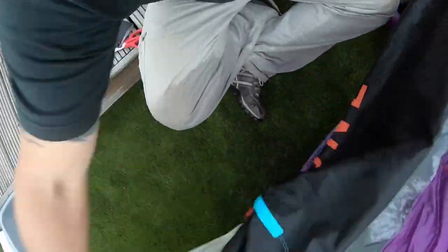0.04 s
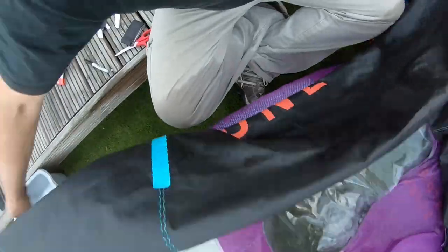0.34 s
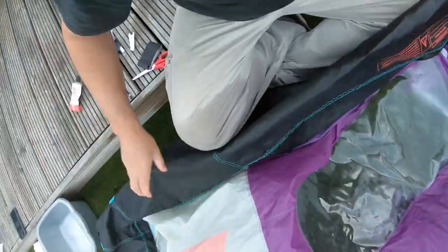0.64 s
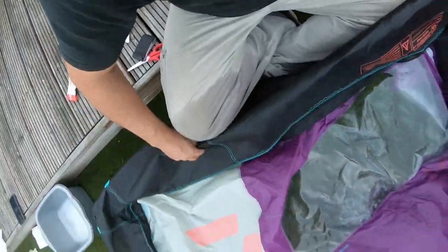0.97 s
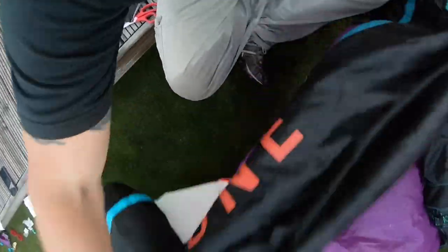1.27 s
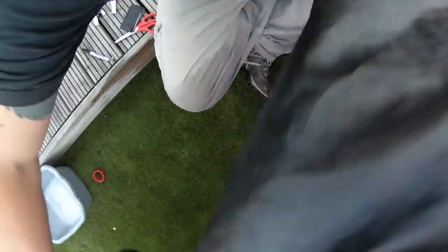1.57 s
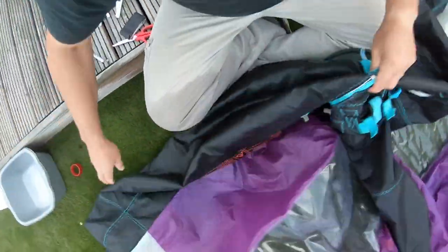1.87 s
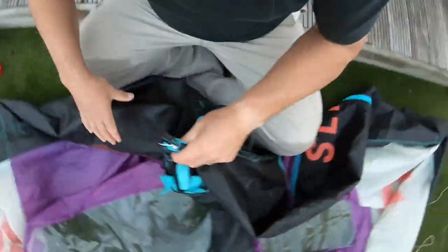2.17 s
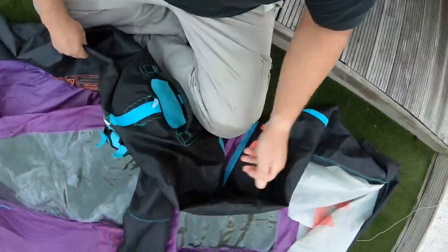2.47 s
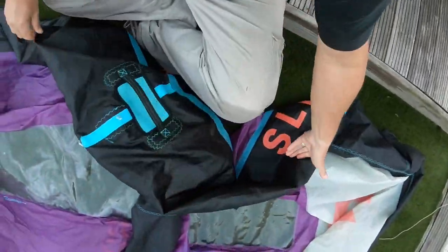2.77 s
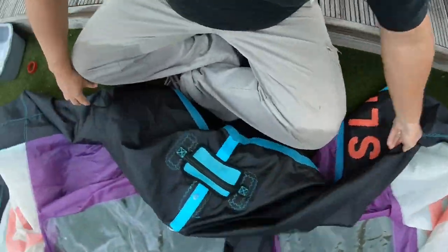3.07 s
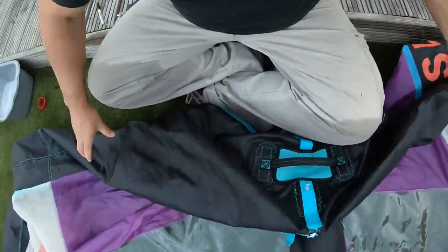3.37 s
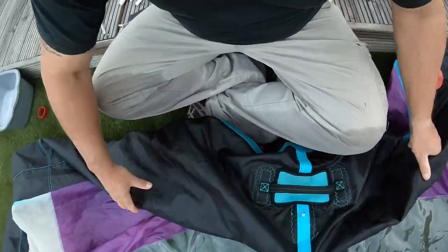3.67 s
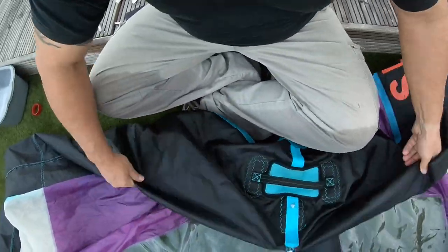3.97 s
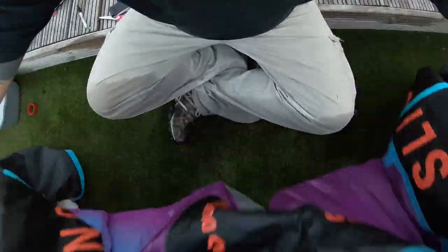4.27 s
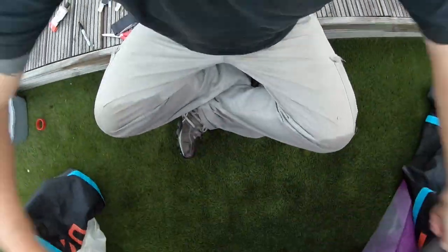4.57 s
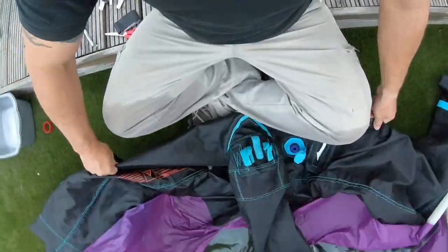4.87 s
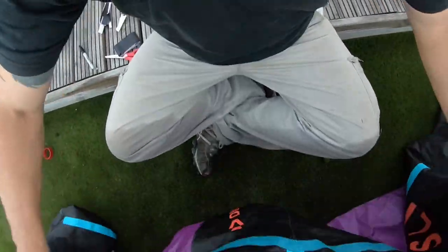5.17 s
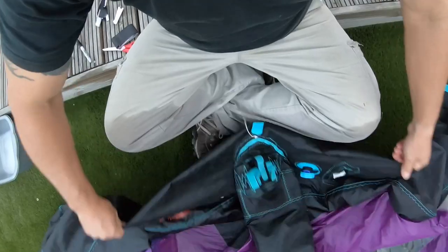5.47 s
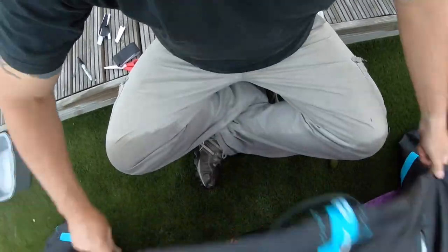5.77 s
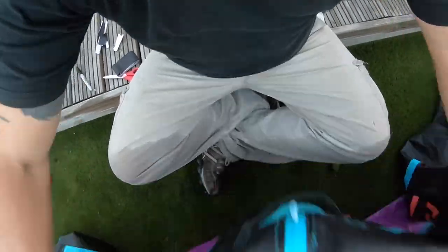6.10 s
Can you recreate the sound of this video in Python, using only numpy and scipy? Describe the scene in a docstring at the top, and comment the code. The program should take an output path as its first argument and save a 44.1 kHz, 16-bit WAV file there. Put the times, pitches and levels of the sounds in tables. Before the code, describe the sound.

The stiff cloth of an inflatable wing is pulled and shaken by hand on a lawn, close to the microphone and slightly to the left. From the start, creases crackle, wide folds rumple and the weave hisses in jerky surges, with a few dry snaps and dull flaps. After a short lull the rustle builds, and near 1.5 seconds a hard shake brings a brief, bright skid, thuds and a low push of air. From about 2 to 4 seconds the handling is gentler, with softer crinkling, light sliding and occasional pats. Just after 4 seconds strong pulls return. Panels flap taut around 4.6, 5.4 and 5.7 seconds, and snaps and billows crowd together until the end, a little past 6 seconds. Faint steady outdoor noise and an uneven breeze rumble lie underneath throughout.

```python
"""The stiff cloth of an inflatable wing is pulled and shaken by hand on a lawn, near the microphone.
From the start, buckling creases crackle, wide folds rumple, friction hisses and the sheet pushes air,
over faint outdoor noise and breeze; the ground reflects it all. Creases snap and panels flap taut.
Near 1.5 s a panel skids brightly amid a hard shake. From 2 to 4 s the handling is gentler;
then strong pulls, flaps and snaps return and crowd together towards the end."""
import sys
import numpy as np
from scipy import signal
from scipy.fft import rfft, irfft
from scipy.io import wavfile

SR = 44100
rng = np.random.default_rng(int(sys.argv[2]) if len(sys.argv) > 2 else 0)


def materialize(psi):
    """Save the field psi as 16-bit PCM at rate SR to the path in sys.argv[1].

    A 1-D psi becomes a single channel; in a 2-D psi each row is a channel.
    """
    bounded = np.clip(np.atleast_2d(psi).T, -1, 1)
    quanta = np.round(bounded * 32767).astype(np.int16)
    wavfile.write(sys.argv[1], SR, quanta)


N = 275184
TIME = np.arange(N) / SR
SLOW_TIME = TIME[::64]


def gain_of(db):
    """Amplitude ratio of a level in decibels."""
    return 10 ** (np.asarray(db) / 20)


def unit_rms(x):
    """Normalisation to rms 1."""
    return x / np.sqrt(np.mean(x ** 2) + 1e-20)


def curve_at(points, hz):
    """Interpolation on a logarithmic frequency axis."""
    f, value = np.transpose(points)
    return np.interp(np.log(hz + 1), np.log(f + 1), value)


def add(mix, s, sound):
    """Superposition of a stereo sound, starting at time s."""
    part = mix[:, max(round(s * SR), 0):][:, :sound.shape[1]]
    part += sound[:, :part.shape[1]]


def panned(x, side_db):
    """Intensity panning: the left channel gains side_db over the right."""
    return x * gain_of(np.array([[.5], [-.5]]) * side_db)


def wander(hz):
    """Random modulation: noise rolled off below 12 Hz and above hz, its extremes compressed."""
    f = np.fft.rfftfreq(N, 1 / SR)
    band = np.exp(-(f / hz) ** 2) * (1 - np.exp(-(f / 12) ** 2))
    drift = irfft(rfft(rng.standard_normal(N)) * band, N)
    return 2 * np.tanh(unit_rms(drift) / 2)


def colour(x, spectrum, size=4096):
    """Minimum-phase filtering, which keeps the fronts of clicks sharp."""
    log_gain = np.log(gain_of(curve_at(spectrum, abs(np.fft.fftfreq(size, 1 / SR)))))
    taps = np.fft.ifft(np.exp(np.conj(signal.hilbert(log_gain)))).real
    return signal.oaconvolve(x, taps[None], axes=1)[:, :x.shape[1]]


def ports(x):
    """Partial coherence: a wide source reaches two microphone ports only partly alike."""
    # likeness of the ports: f/Hz, correlation
    likeness = [(30, 1), (70, 0.44), (150, 0.92), (350, 0.99), (700, 0.65), (1300, 0.18), (1800, 0.55),
                (3700, 1), (5000, 0.49), (6200, 0.31), (7200, 0.033), (15000, 0.062)]
    # lead of the left port: f/Hz, phase/rad
    lead = [(300, -0.43), (550, 0.14), (800, -1.52), (1400, -0.46), (2300, -0.79), (2800, -0.81),
            (5000, 0.26)]
    # excess of left over right: f/Hz, level/dB
    lean = [(40, 7), (110, 4.5), (200, 2.5), (380, 4), (700, 5), (1290, 2.5), (2380, -1), (4400, 3.5),
            (8120, 2), (15000, -3)]
    hz = np.fft.rfftfreq(x.shape[1], 1 / SR)
    common, apart = rfft(x)
    same = np.clip(curve_at(likeness, hz), -.99, .99)
    mid, side = common * np.sqrt(1 + same), apart * np.sqrt(1 - same)
    pair = np.array([mid + side, (mid - side) * np.exp(-1j * curve_at(lead, hz))])
    return irfft(panned(pair, curve_at(lean, hz) - 3), x.shape[1])


def noise(spectrum):
    """Spectral shaping of Gaussian noise, in stereo at rms 1."""
    return unit_rms(ports(colour(rng.standard_normal((2, N)), spectrum)))


def arch_db(s, swell_s, settle_s):
    """Envelope of a movement: up 21.5 dB in swell_s, a rounded top at s, down as far in settle_s."""
    return -21.5 * np.maximum((s - SLOW_TIME) / swell_s, (SLOW_TIME - s) / settle_s) ** 1.158


def power_sum(levels_db):
    """Incoherent addition: the amplitude of overlapping movements whose powers add."""
    return np.interp(TIME, SLOW_TIME, np.linalg.norm(gain_of(levels_db), axis=0))


def buckles(per_s, spread_db, low_hz, high_hz, cycles, count=48):
    """Shot noise: spots of cloth buckle at random, each a damped oscillator; a few buckles are large."""
    t, out = np.arange(2048) / SR, np.zeros((2, N))
    size = gain_of(spread_db * np.minimum(rng.exponential(1, N), 4))
    occurs = rng.random(N) < per_s / SR
    kicks = size * occurs * rng.choice([-1, 1], (2, N))
    spot = rng.integers(0, count, N)
    for k, hz in enumerate(np.geomspace(low_hz, high_hz, count)):
        ring = hz * np.cos(2 * np.pi * hz * t) * np.exp(-t * hz / cycles)  # small spots ring sharper
        out += signal.oaconvolve(kicks * (spot == k), ring[None], axes=1)[:, :N]
    return unit_rms(out)


def rustle(grains, rubbing, spectrum, swell_db):
    """Amplitude modulation gathers grains and friction noise into clumps, coloured by the cloth."""
    clumps = (grains + rubbing * rng.standard_normal((2, N))) * gain_of(swell_db)
    return unit_rms(ports(colour(clumps, spectrum)))


def crinkling(jerks):
    """Buckling of small creases radiates a dense crackle with stray ticks."""
    # response of the creases: f/Hz, level/dB
    spectrum = [(300, -13.5), (700, -5.5), (1200, -2), (2200, 0), (2700, -3), (3500, -2), (4500, -11),
                (5400, -7), (6300, -6), (7000, -12), (7800, -15.5), (8400, -45), (11000, -47), (16000, -29)]
    creases = buckles(per_s=6000, spread_db=3, low_hz=450, high_hz=8750, cycles=2.3)
    ticks = buckles(per_s=19, spread_db=1.5, low_hz=1780, high_hz=5000, cycles=0.68, count=6)
    return rustle(creases + gain_of(-19) * ticks, 1, spectrum, 1.22 * jerks)


def rumpling(jerks):
    """Wide folds buckle at lower natural frequencies, with stray thuds."""
    # response of the folds: f/Hz, level/dB
    spectrum = [(60, -33), (130, -1), (220, 1), (420, -3), (600, -6.5), (900, -7.5), (1600, -17.5),
                (4000, -50)]
    folds = buckles(per_s=1600, spread_db=3, low_hz=89.7, high_hz=2460, cycles=1)
    thuds = buckles(per_s=15, spread_db=1, low_hz=377, high_hz=1130, cycles=1.3, count=8)
    return rustle(folds + gain_of(-18.5) * thuds, 1.95, spectrum, 0.72 * jerks)


def weave_hiss(sliding, jerks):
    """Friction of weave on weave gives a smooth hiss in pulls and skids."""
    # friction spectrum: f/Hz, relative level/dB
    sheen = [(2000, -43), (3500, -59), (4600, -22), (6200, 34), (7700, 33.5), (8700, 28.5), (10200, 24.5),
             (12000, 18.5), (14000, 16.5), (16000, -6)]
    return np.hypot(sliding, skidding()) * gain_of(1.57 * jerks) * noise(sheen)


def moved_air(pull, jerks):
    """Displacement of air by billows and by the draught of each pull gives a low rumble."""
    # billows of the loose sheet: peak t/s, level/dB, swell and settle time/s
    billows = [(0.06, -34.5, .3), (0.246, -28.5, 0.053), (0.57, -24, 0.058), (1.49, -17, 0.14),
               (1.575, -17, 0.15), (1.70, -26, 0.055), (3.918, -28, 0.051), (4.343, -35, 0.14),
               (4.589, -20, 0.054), (4.744, -24.5, 0.12), (5.051, -26, 0.043), (5.18, -25, .09),
               (5.39, -22, .14), (5.492, -17, 0.14), (5.7, -20, 0.1), (5.895, -22, .22), (6.21, -28, 0.16)]
    # pressure spectrum: f/Hz, relative level/dB
    spectrum = [(10, -18), (25, -9), (45, 3.5), (72, 2.5), (100, 4), (130, 0.5), (180, -3.5), (300, -18.5),
                (800, -69.5)]
    s, top_db, length_s = np.transpose(billows)[:, :, None]
    billowing = power_sum(top_db + arch_db(s, length_s, length_s))
    draught = gain_of(-13.5) * pull
    return np.hypot(billowing, draught) * gain_of(-1.5 + 0.25 * jerks) * noise(spectrum)


def pulled_cloth():
    """Common modulation: each jerky pull drives creases, folds, hiss and air together."""
    # pulls of the hands: fastest t/s, swell/s, settle/s, level/dB, extra rumple/dB, extra hiss/dB
    pulls = [(0.048, 0.93, 0.28, -25, 1, 1.5), (0.245, 0.05, 0.088, -32, 1, 0),
             (0.41, 0.43, .25, -39, 3, 4.5), (0.55, 0.24, 0.3, -33, 0, 0.5),
             (0.77, 0.14, 0.23, -42, 6.5, -4.5), (1.195, 0.24, 0.25, -24.5, 1, 0.5),
             (1.40, 0.18, 0.19, -29, -19, 7), (1.54, 0.18, 0.24, -20.5, 1, -1),
             (1.825, 1, 0.31, -34.5, 1.5, 0.5), (2.083, 0.25, 0.52, -41, 1.5, 0),
             (2.29, 0.26, 1, -46, 1.5, -2), (2.555, 0.24, 0.23, -41.5, 3.5, 7),
             (2.8, 0.38, 1, -48.5, 2, -14), (2.99, 0.18, .15, -41.5, 1, -2),
             (3.1, 0.17, 0.51, -34.5, -2.5, -0.5), (3.199, 0.25, .2, -34.5, -1.5, 6),
             (3.46, 0.17, 0.12, -47.5, -1, 0), (3.635, 0.027, 0.13, -41.5, 1, 2),
             (3.689, 0.1, 0.32, -39, 0.5, 1), (3.918, 0.097, 0.043, -42, 2.5, -1),
             (4.11, 0.23, 0.38, -30.5, 4.5, 1.5), (4.255, 0.17, 0.37, -26.5, -1.5, -0.5),
             (4.5, 0.32, 0.28, -29, -11, 9.5), (4.59, 0.2, 0.46, -26.5, 3.5, -7),
             (4.755, .15, 0.23, -23, -2.5, 2), (4.987, 0.25, 0.62, -31, -3.5, 5),
             (5.165, 0.093, 0.22, -26.5, -3, 3), (5.3, 0.27, 0.36, -35, 6.5, 3),
             (5.44, 0.35, 0.31, -27, 0.5, 3.5), (5.69, 0.095, .16, -22.5, -2.5, 2.5),
             (5.829, 0.11, 0.062, -24.5, .5, 0.5), (5.905, 0.094, 0.28, -26, 0, 2.5),
             (6.22, 0.31, .6, -26.5, -3, 5)]
    # where the cloth lies: t/s, left over right/dB
    side_curve = [(0, 4), (.4, 2.5), (1.2, 2), (1.5, 5.5), (1.85, 2), (2.45, -0.5), (3.05, 4.5), (3.7, 4.5),
                  (4.0, 2), (4.45, 3), (6.24, 3)]
    s, swell_s, settle_s, top_db, folds_db, weave_db = np.transpose(pulls)[:, :, None]
    arch = arch_db(s, swell_s, settle_s)
    pull = power_sum(top_db + arch)
    folding = power_sum(top_db + folds_db + 0.96 * arch)
    pivot_db, hiss_slope = -27.5, 1.14  # hiss grows faster with speed than crackle does
    sliding = power_sum(pivot_db - 17 + weave_db + hiss_slope * (top_db + arch - pivot_db))
    jerks = wander(hz=60)
    out = gain_of(-1.15) * pull * crinkling(jerks) + folding * rumpling(jerks)
    out += weave_hiss(sliding, jerks) + moved_air(pull, jerks)
    return panned(out, np.interp(TIME, *np.transpose(side_curve)))


def ground_reflection(direct):
    """Scattering at the lawn returns a brief diffuse reflection after 3 ms."""
    t = np.arange(3000) / SR
    scatter = rng.standard_normal((2, len(t))) * np.exp(-t / 0.0047) * (t > .003)
    return signal.oaconvolve(direct, scatter / np.linalg.norm(scatter[0]), axes=1)[:, :N]


def outdoors():
    """Distant outdoor sound forms a stationary noise floor."""
    # ambient spectrum: f/Hz, relative level/dB
    spectrum = [(24, -16), (40, -45), (191, -18), (490, 17), (804, -8), (1060, -3), (1290, -7), (6140, -56),
                (15000, -62)]
    return gain_of(-57) * noise(spectrum)


def breeze():
    """Pressure fluctuations of a faint, uneven breeze rumble on the microphone."""
    # wind spectrum: f/Hz, relative level/dB
    spectrum = [(10, -5.5), (25, 7), (39, -2), (56, 8), (100, -6), (170, -11), (300, -25), (800, -82)]
    return gain_of(-45 + 2.9 * wander(hz=24)) * noise(spectrum)


def burst(hz, decay_s, rise_s, cycles, rough, apart, crack):
    """Transient excitation: a push and a dying flurry drive a broad resonance; crack adds bare flurry."""
    t = np.arange(4096) / SR
    common, side = rng.uniform(-1.005, 1, (2, len(t))) * np.exp(-t / decay_s) * (1 - np.exp(-t / rise_s))
    flurry = np.array([common + apart * side, common - apart * side]) / np.linalg.norm(common)
    ring = np.sin(2 * np.pi * hz * t) * np.exp(-t * hz / cycles)
    response = signal.fftconvolve(rough * flurry + (t == 0), ring[None], axes=1)[:, :len(t)]
    jump = unit_rms(response) + crack * unit_rms(flurry)
    return unit_rms(jump) * np.sqrt((decay_s + cycles / hz) / t[-1]) / 2  # similar peaks at any length


def snaps():
    """Snap-through instability: single stiff creases pop with a dry tick."""
    # snapping creases: t/s, relative level/dB, f/Hz, left over right/dB, decay/s
    creases = [(0.029, -11, 3460, 3, 0.00029), (0.1725, -11.5, 6000, 3, 0.00062),
               (0.1759, -18.5, 1900, -7, .0011), (0.2464, -24, 2090, -7, 0.0018),
               (0.6243, -31, 2620, 4, 0.00069), (0.902, -33.5, 3530, 3, .0008),
               (1.162, -25, 4430, -2, 0.0024), (1.4451, -16.5, 2350, 1, 0.0025),
               (1.5705, -11, 3630, -1, 0.00065), (1.607, -17.5, 2890, -5, 0.0019),
               (2.9135, -30.5, 4560, 1, 0.0011), (3.24, -21.5, 4270, 8, 0.0021),
               (3.508, -45, 1900, 13, .0012), (3.616, -36.5, 2270, 10, 0.00053),
               (4.5518, -13, 1930, 0, 0.00038), (5.139, -16.5, 2500, 3, 0.00054),
               (5.1748, -17.5, 2090, 2, 0.00086), (5.1967, -15.5, 1800, 1, .002),
               (5.6772, -13, 3360, 1, 0.00027), (5.683, -13.5, 3130, 6, 0.0011),
               (5.6827, -16.5, 7600, 6, 0.00055), (5.889, -19.5, 3700, 4, 0.0011)]
    out = np.zeros((2, N))
    for s, db, hz, side_db, decay_s in creases:
        tick = burst(hz, decay_s, rise_s=.0001, cycles=0.72, rough=3.5, apart=0.61, crack=0.24)
        add(out, s, panned(gain_of(db + 6) * tick, side_db))
    return colour(out, [(150, -24), (1000, 1), (3500, 0.5), (4500, -9.5), (6400, 7.5), (8000, -4),
                        (9500, -8), (15000, -25)])


def flaps():
    """A panel pulled taut or patted is a heavily damped membrane: a thud of a few cycles."""
    # flaps and pats: t/s, relative level/dB, f/Hz, left over right/dB, decay/s
    panels = [(0.0925, -17.5, 337, 6, 0.012), (0.1621, -21.5, 450, -2, 0.0054),
              (0.2364, -21, 169, 5, 0.0082), (0.9867, -30.5, 550, 0, .006), (1.0812, -29.5, 850, -5, 0.01),
              (1.1355, -13.5, 295, 1, 0.0047), (1.138, -24, 860, -7, 0.0023), (1.488, -22, 1410, 3, .005),
              (1.4933, -7, 125, 11, 0.0044), (1.539, -9, 193, 8, 0.0071), (1.6466, -13.5, 226, 4, .004),
              (1.6999, -12, 141, 11, .005), (2.3195, -36.5, 555, -1, .005), (2.515, -24, 430, 3, 0.0047),
              (2.674, -30.5, 483, 0, 0.0038), (3.1948, -23.5, 225, 1, 0.0046),
              (3.5057, -38, 896, 10, 0.0043), (3.683, -21.5, 262, 2, .007), (3.912, -29, 694, 1, 0.0012),
              (4.5782, -9, 138, 12, 0.0042), (4.6143, -22.5, 520, 1, 0.0047),
              (4.731, -13.5, 377, 6, 0.0064), (4.7535, -10.5, 233, 5, 0.013), (5.316, -17, 142, 12, 0.01),
              (5.393, -6.5, 200, -2, 0.0065), (5.4086, -9.5, 380, 4, 0.0056),
              (5.4815, -11.5, 115, -5, 0.0052), (5.552, -26, 950, -8, 0.0021), (5.685, -4.5, 204, 4, .009),
              (5.896, -15.5, 217, -5, 0.014), (5.931, -13, 398, 5, 0.0033)]
    out = np.zeros((2, N))
    for s, db, hz, side_db, decay_s in panels:
        thud = burst(hz, decay_s, rise_s=0.00048, cycles=0.86, rough=0.92, apart=0.48, crack=0.27)
        add(out, s, panned(gain_of(db - 0.5) * thud, side_db + 0.5))
    return colour(out, [(25, -1.5), (90, 1.5), (200, -3.5), (400, 4.5), (1500, 13), (3500, -1.5),
                        (7000, -9.5), (12000, -38)])


def skidding():
    """Envelope of sliding friction as one taut panel skids over another: quick start, hold, quick stop."""
    # skids: start t/s, duration/s, level/dB
    skids = [(1.453, 0.13, -33), (2.523, .095, -56), (3.06, 0.33, -61)]
    start, length_s, level_db = np.transpose(skids)[:, :, None]
    edge_s = 0.0061
    inside = np.minimum(TIME - start, start + length_s - TIME) / edge_s
    return (gain_of(level_db) * (1 + np.tanh(inside)) / 2).sum(0)


def scene():
    """Superposition of the cloth, its ground reflection, outdoor noise and breeze."""
    direct = pulled_cloth() + snaps() + flaps()
    return direct + gain_of(-14) * ground_reflection(direct) + outdoors() + breeze()


def record(dry):
    """Soft saturation rounds the loudest cracks; a low-pass filter then limits the band."""
    edge_hz = 15750
    low_pass = signal.firwin(511, edge_hz, window=("kaiser", 9), fs=SR)
    return signal.oaconvolve(np.tanh(dry), low_pass[None], "same")


dry = scene()
out = record(dry)
materialize(out)
```